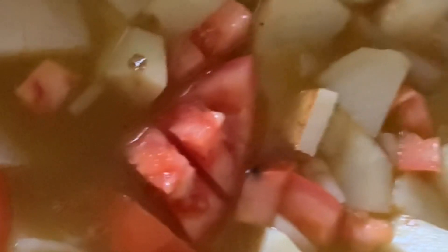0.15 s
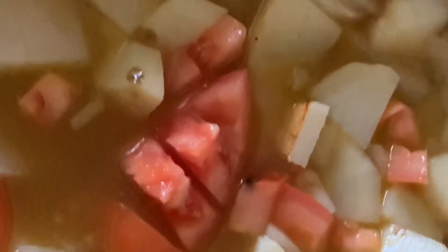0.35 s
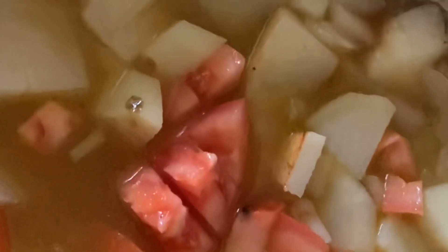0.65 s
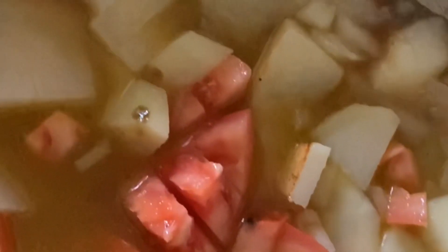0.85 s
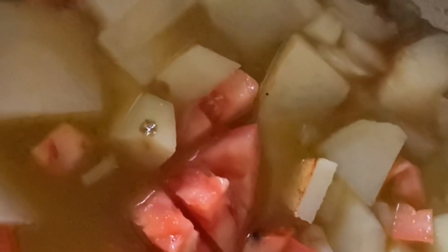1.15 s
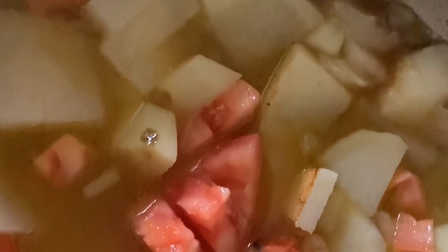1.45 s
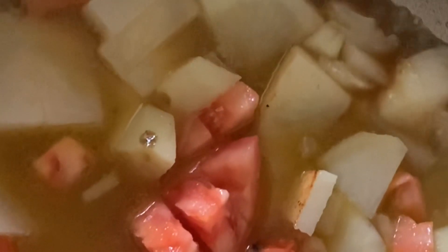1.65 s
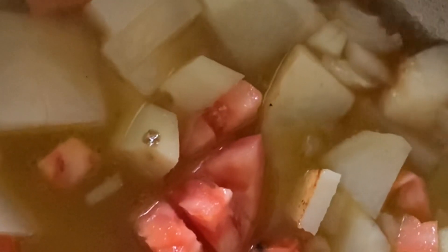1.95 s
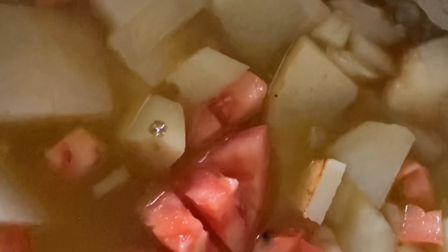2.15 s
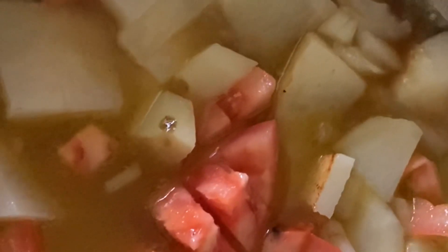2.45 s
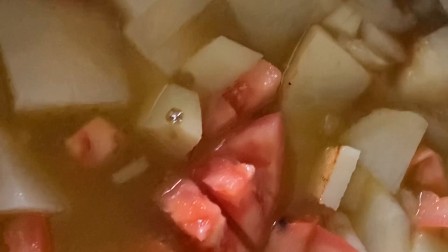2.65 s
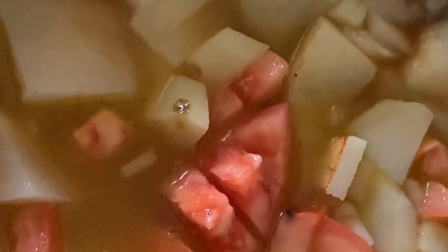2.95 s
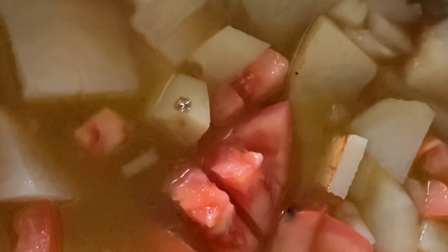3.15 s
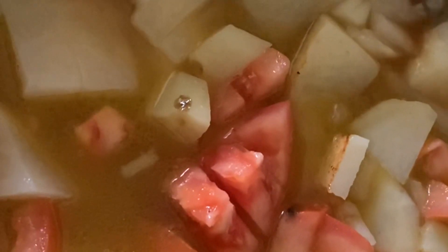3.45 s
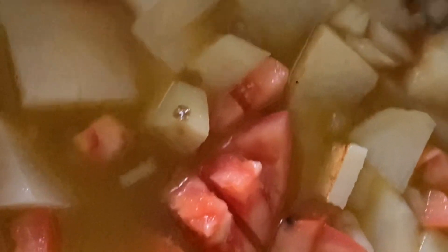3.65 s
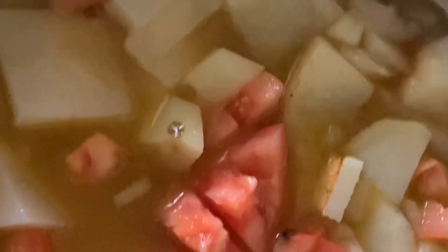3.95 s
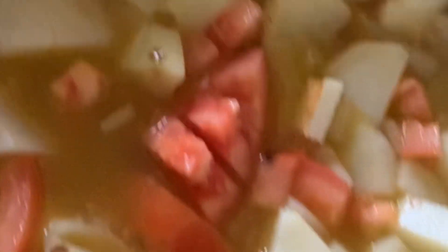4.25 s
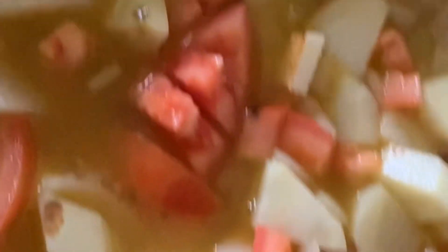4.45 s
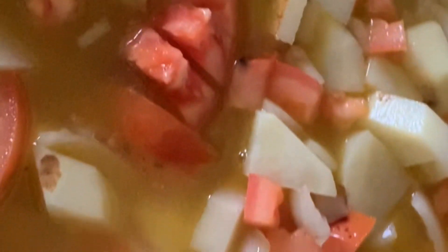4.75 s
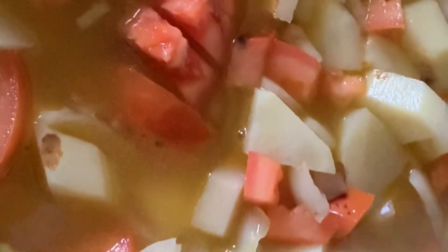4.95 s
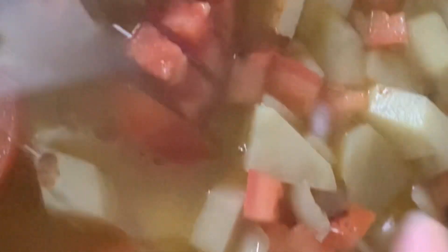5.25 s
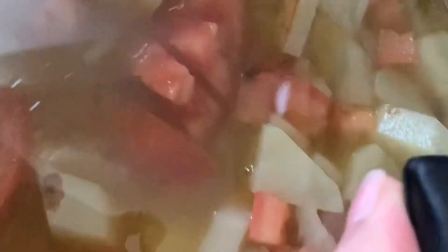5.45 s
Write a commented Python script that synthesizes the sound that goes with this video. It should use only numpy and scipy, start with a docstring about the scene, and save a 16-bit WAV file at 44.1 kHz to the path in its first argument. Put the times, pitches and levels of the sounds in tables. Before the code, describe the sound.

A close stereo pickup in a small kitchen with a short, faint reverberation. Throughout, vegetables simmer in oil and water: a quiet, fine, bright sizzle of dense tiny clicks, with lone sharp spits, over a soft low burner roar. From 0 to 0.1 s a glass lid ticks on the worktop; knocks follow at 0.6 and 0.8 s, the latter with a bright, dry snap. Between 1.2 and 1.9 s it rattles and rubs in small uneven clacks. A hard glassy clack lands at 2.4 s, then a dull, heavy thud at 2.94 s. Soft scraping swells around 3.2 to 3.6 s, with a low bump at 3.65. Mostly sizzle remains until muted thuds near 4.6 and 4.9 s. Around 5.0 s the lid moves over the pot, making the sound duller and hollow. It touches the rim at 5.4 s and clatters loudly at 5.55 s, glass and metal ringing briefly.

```python
"""A fine sizzle with lone spits is heard over a low burner roar: vegetables simmer in oil and water.
Roar is shaped noise, sizzle a crowd of short clicks over hiss, each spit a burst of noise.
A glass lid is knocked, slid and rolled on the worktop: rough forces clack and excite its modes.
Soft thuds, sines mostly falling in pitch, come through the floor. The lid is lowered over the pot,
muffling it, and clatters onto the rim: now the modes of the pot ring too."""
import sys
import numpy as np
from scipy import signal
from scipy.fft import rfft, irfft, next_fast_len
from scipy.io import wavfile

SR = 44100
rng = np.random.default_rng(int(sys.argv[2]) if len(sys.argv) > 2 else 0)


def nominal_scale(level):
    """Amplitude ratio for a level in decibels (scalar or array-like)."""
    x = np.asarray(level, float) / 20
    return 10 ** x


def dump(signal):
    """Clip the signal to [-1, 1] and save it as 16-bit WAV at the path in sys.argv[1]."""
    limited = np.clip(np.atleast_2d(signal).T, -1, 1)
    pcm = np.round(limited * 32767).astype(np.int16)
    wavfile.write(sys.argv[1], SR, pcm)


N = 247160

# sounds of the pot before the lid shades them: (time [s], roar level [dB], sizzle level [dB])
POT_LEVELS = [(0, -36.5, -47), (.2, -40, -42), (.45, -42, -43.5), (1.27, -39.5, -42.5), (1.56, -37, -42.5),
              (1.8, -39, -43), (3.35, -40, -42.5), (3.6, -40, -42.5), (4.3, -41, -40.5), (4.9, -41, -43),
              (5.4, -38.5, -44.5), (5.5, -38, -49.5), (5.6, -26, -28.5)]
# spectrum of the burner roar: (frequency [Hz], level [dB])
ROAR_SPECTRUM = [(25, -38), (38, -15.5), (55, -1.5), (95, 0), (135, 0), (240, -1), (370, -3.5), (800, -3.5),
                 (1350, -9), (1900, -6), (2260, -5.5), (2700, -13.5), (3300, -22), (5000, -12.5),
                 (9000, -23.5)]
# correlation of the roar between left and right: (frequency [Hz], likeness [0-1])
ROAR_LIKENESS = [(60, .995), (250, .97), (500, .75), (1200, .75), (2500, .65), (4000, .8), (6000, .95)]
# spectrum of the sizzle: (frequency [Hz], level [dB])
SIZZLE_SPECTRUM = [(300, -39.5), (1000, -16.5), (2500, -8), (4000, 2.5), (6000, 0.5), (9000, 4.5),
                   (12000, 1.5), (16000, 0)]
# lone spits of oil: (time [s], peak level [dB], centre frequency [Hz])
OIL_SPITS = [(0.084, -20, 10500), (0.0908, -23.5, 6700), (0.0943, -12, 6850), (0.1271, -24, 10600),
             (0.131, -18, 10600), (0.142, -30, 10600), (0.1977, -24.5, 11200), (0.2758, -21, 6560),
             (0.415, -20.5, 10500), (0.4642, -21, 7170), (0.5345, -24, 6440), (0.6883, -22.5, 7340),
             (0.733, -25.5, 6570), (1.024, -17.5, 6530), (1.207, -16.5, 6600), (1.299, -18, 6740),
             (1.825, -22, 11000), (1.831, -15, 7200), (1.8634, -13.5, 11000), (1.917, -26.5, 7500),
             (2.3656, -16.5, 7300), (2.369, -15, 11000), (2.376, -25.5, 7000), (2.407, -18.5, 11000),
             (2.651, -18, 6560), (2.7287, -19, 6040), (3.3148, -19, 5900), (3.495, -21.5, 7050),
             (3.71, -20.5, 6910), (3.7733, -18, 6040), (3.865, -25.5, 7000), (4.0838, -16.5, 11500),
             (4.192, -28, 11000), (4.377, -17, 6640), (4.612, -33.5, 6180), (4.926, -28.5, 10900),
             (4.957, -32, 13500), (5.0483, -27, 14500), (5.053, -23.5, 6800), (5.0993, -25.5, 6540),
             (5.116, -28.5, 14500)]
# how far the lid covers the pot: (time [s], cover [0-1])
LID_COVER = [(0, 0.1), (4.0, 0.05), (4.85, 0.1), (5.08, 0.59), (5.4, 0.6), (5.6, 0.57)]
# resonances of the air under the lid, at full cover: (frequency [Hz], width [Hz], level [dB])
CAVITY_MODES = [(568.8, 17.3, 10.5), (1097, 104.5, 11), (1616, 60, 4.5), (2140, 81, -5)]
# thuds through the floor: (time [s], nominal peak [dB], pitch [Hz], t60 [ms], fall in pitch [0-1])
FLOOR_THUDS = [(0.591, -31.5, 236.8, 68, 0.03), (1.097, -26, 129, 60, 0.85), (1.209, -29, 95.2, 110, 0.2),
               (2.035, -30, 99.8, 170, 0.91), (2.196, -27, 137.7, 73, 0.31), (2.223, -30, 105, 51, 0.15),
               (2.379, -29.5, 98.8, 195, 0.96), (2.713, -26, 180.2, 42.5, 0.6),
               (2.772, -34.5, 149.7, 85, 0.08), (2.9396, -13.5, 172.3, 59.7, 0.49),
               (2.966, -25.5, 130.5, 250, 0), (3.652, -29, 113, 250, 0.72), (4.608, -29, 96.6, 155, 0.95),
               (4.929, -26.5, 105.3, 102, 0.96), (5.029, -34, 106, 510, 0.45),
               (5.464, -37.5, 60.4, 170, 0.4)]
# one bright snap off to one side: (time [s], peak level [dB])
SNAP_EVENT = (0.8047, -11.5)
# modes of the snap: (frequency [Hz], level [dB], t60 of the first resonator [s])
SNAP_RESONANCES = [(4683, 3.5, 0.0052), (3412, 5, 0.0081)]
# touches of the lid on worktop, then rim:
# (time [s], middle-band peak [dB], low over middle band [dB], ring [dB], decay constant [ms])
LID_TOUCHES = [(.0487, -29.5, -1.5, -4.5, 1.84), (.0515, -24.5, 1.5, -5, 5.1), (.0555, -38.5, 6.5, -14, 7),
               (.0774, -45.5, 15, -22.5, 9.9), (.0927, -26.5, -2, -25, 8.1), (.462, -37, -1.5, -25.5, 9.9),
               (.5926, -25.5, -2.5, -13, 18.4), (.8004, -31.5, -4, -30, 1.75),
               (.8041, -20.5, -6, -25, 2.33), (.8085, -28.5, -5.5, -2.5, 17.8), (1.1827, -33.5, 6, -9, 1.7),
               (1.2022, -24, 2, -13.5, 10.5), (1.2135, -27.5, -10, -19, 2.9), (1.2175, -37.5, 6, -9.5, 2.7),
               (1.2251, -29.5, 5, -26, 1.28), (1.255, -34.5, 8.5, -6.5, 4.5), (1.2695, -26, 2.5, -4, 3.5),
               (1.282, -28, -8, -4.5, 16), (1.303, -31.5, -4.5, -1, 8.4), (1.3319, -21, -14, -7, 4.27),
               (1.343, -34.5, -5, -20, 3.2), (1.468, -30, -7, -21.5, 6.5), (1.6018, -27.5, -2.5, -17, 6),
               (1.7875, -32, 4, -14, 2.3), (1.7922, -25, -19.5, -4, 9), (1.812, -40.5, 3, -22.5, 3.2),
               (1.8205, -32.5, -8.5, -21.5, 2.55), (1.831, -22, -3.5, -32, 6.2), (1.839, -27, -1, -25, 2.2),
               (1.9155, -31.5, -2.5, 0.5, 8.2), (2.1904, -34, 3.5, -14, 4), (2.2134, -40.5, 15.5, -9, 3.35),
               (2.3728, -14.5, -9, -7, 4.5), (2.3774, -16.5, -4.5, -2, 2.9),
               (2.3812, -16.5, -0.5, -13, 3.5), (2.3955, -25, 0.5, -13, 5.2),
               (2.4065, -31.5, 0.5, -11, 3.9), (2.419, -30.5, -8, 0, 4.7), (2.4987, -27, -11, -6, 13),
               (2.9372, -28, 12.5, -14, 3.26), (2.945, -31.5, 10, -17, 6.4), (5.4098, -22.5, -3.5, -4, 4.9),
               (5.416, -29.5, 5.5, -32.5, 4.7), (5.4274, -32.5, 6, 0, 14.4),
               (5.5505, -12, -0.5, -7.5, 3.33), (5.5674, -25.5, 3.5, 0.5, 12.2),
               (5.5964, -31, 15, -26.5, 4)]
# slides on worktop, then rim; swell and fade are the times to or from SLIDE_FADE_DB below strongest:
# (strongest time [s], swell [s], fade [s], relative friction [dB], low over middle band [dB])
LID_SLIDES = [(1.525, 0.09, 0.0944, -32.5, 5), (1.625, 0.092, 0.054, -47.5, 7),
              (1.71, 0.0305, 0.031, -37, -2), (1.81, 0.125, 0.186, -36, 4.5),
              (2.055, 0.113, 0.097, -40, 6.5), (2.785, 0.074, 0.045, -34.5, -1.5),
              (3.17, 0.237, 0.56, -39.5, 4.5), (3.334, 0.328, 0.155, -32.5, -11),
              (3.48, 0.257, 0.074, -34, -4.5), (3.62, 0.122, 0.037, -42.5, 2),
              (5.512, 0.0049, 0.0456, -34, 10), (5.526, 0.017, 0.0445, -35, 6.5)]
# modes of lid and worktop: (frequency [Hz], level [dB], t60 [s], weight of spot 1 against spot 0 in exciting it
# [0-1])
LID_MODES = [(130.34, -11.5, 0.324, 0.83), (312.7, -16, 0.216, 0.95), (378.3, -6.5, 0.1173, 0.42),
             (640.6, -5, 0.1125, 0.59), (1034.7, -2, 0.0262, 0.28), (789.7, -11.5, 0.0514, 0.05),
             (1617, -23, 0.136, 0.69), (1799.6, -20.5, 0.125, 0), (2134, -15, 0.0854, 0),
             (2148, -10, 0.0943, 0), (2277.7, -5, 0.165, 1), (2492, -16, 0.185, 1), (2708, -17, 0.15, 0.69),
             (2969, -20, 0.105, 0.08), (2973, -38, 0.39, 0), (4267, -11, 0.046, 1)]
# modes of the pot: (frequency [Hz], level [dB], t60 [s], weight of spot 1 against spot 0 in exciting it [0-1])
POT_MODES = [(319.1, -2.5, 0.203, 0.42), (409.4, -8, 0.099, 0.74), (536, -12.5, 0.053, 0.85),
             (757.5, -14.5, 0.136, 0.14), (3225, -8, 0.11, .3), (3660, -14, 0.096, 0.42),
             (4374, -8, 0.057, 0.48), (5570, -7.5, 0.059, 0.64), (6236, -7.5, 0.089, 0.62),
             (6550, -18.5, .07, 0.6), (7145, -10, 0.085, 0.81), (8280, -29.5, 0.043, 0.44),
             (9890, -8.5, 0.051, 0.34), (11000, -26.5, 0.053, 0.3)]
# low, middle and high band of a contact on the worktop: (from [Hz], to [Hz])
WORKTOP_BANDS = [(200, 998), (1300, 2648), (3600, 5810)]
# low, middle and high band of a contact on the rim: (from [Hz], to [Hz])
RIM_BANDS = [(280, 569), (700, 2430), (3900, 8440)]
# where along its edge the lid bears: (time [s], spot [0-1])
BEARING_SPOT = [(0, 0.77), (1.2, 0.02), (1.55, 0.66), (1.9, 0.36), (2.2, 0.49), (2.38, 0.14), (2.5, 0.38),
                (3.14, 0.11), (3.24, 0.4), (3.33, 0.82), (3.42, 0.45), (3.48, 1), (3.62, 0.98), (5.41, 0.1),
                (5.55, 0.91)]
# microphone pair: (frequency [Hz], right lags left, negative leads [rad], left over right [dB])
MICROPHONE_PAIR = [(0, 0, 0), (120, 0, .7), (300, -.15, 2), (600, -.9, 2), (950, -.5, -2.5),
                   (1500, .1, -1.5), (2200, .35, 0), (3200, 1.1, -.5), (4720, 3.14, 0), (6930, 6.28, 0),
                   (15200, 18.85, 0), (22050, 29.2, 0)]

KITCHEN_T60_S, WALL_CUT_HZ, KITCHEN_DB = 0.131, 13000, -11
THUD_RISE_S, THUD_HOLD_S = 0.006, 0.016  # the push builds, then holds before it dies
SNAP_LAG = 2  # samples the right side hears the snap later, relative to the pot
ON_RIM_S = 5.0  # contacts after this time are on the rim
TOUCH_RISE_S, CHATTER_DB = 0.000458, 6.5  # rise of a contact; its unevenness from snap to snap
WORKTOP_HIGH_DB, RIM_HIGH_DB = -6, 4.5  # high over middle band of a contact
RIM_SOFT_DB, HARD_DB_PER_10DB = -18.5, -19  # rim touches above this level lose treble at this rate
SLIDE_FADE_DB = 25
TOP_HZ, TOP_DB = 15780, -38  # treble cut: above this frequency, by this gain


def rms_one(x):
    """Normalisation: equal mean power, so rms 1."""
    return x / np.sqrt(np.mean(x ** 2) + 1e-20)


def in_time(rows):
    """Linear interpolation: the columns of a curve, sample by sample."""
    s, *columns = np.transpose(rows)
    return [np.interp(np.arange(N) / SR, s, column) for column in columns]


def at_hz(points, hz):
    """Logarithmic frequency scale: a spectrum is read by interpolation along it."""
    point_hz, value = np.array(points).T[:2]
    return np.interp(np.log(hz), np.log(point_hz), value)


def band(x, low_hz, high_hz):
    """Band-pass filtering by a Butterworth filter."""
    edges = [low_hz, min(high_hz, .45 * SR)]
    return signal.sosfilt(signal.butter(2, edges, "band", fs=SR, output="sos"), x)


def drift(rate_hz):
    """Low-pass filtered noise: a slow random curve of spread 1."""
    step = 40  # samples between computed points
    r = np.exp(-2 * np.pi * step * rate_hz / SR)
    noise = rng.standard_normal(N // step + 2002)
    slow = signal.lfilter([1], [1, -2 * r, r * r], noise)[2000:]
    return np.interp(np.arange(N) / step, np.arange(len(slow)), rms_one(slow))


def ring(force, hz, t60):
    """Damped resonance: a unit click sets a decaying sine of height 1 ringing."""
    r, w = nominal_scale(-60 / (t60 * SR)), 2 * np.pi * hz / SR
    return signal.lfilter([0, np.sin(w)], [1, -2 * r * np.cos(w), r * r], force + 1e-18)


def add(track, s, piece):
    """Superposition: a piece is mixed in at s seconds."""
    i = round(s * SR)
    track[..., i:i + piece.shape[-1]] += piece[..., :N - i]


def coloured(x, spectrum):
    """Spectral shaping: a flat sound takes on a spectrum, at rms 1."""
    hz = np.maximum(np.fft.rfftfreq(N, 1 / SR), 1)
    return rms_one(irfft(rfft(x) * nominal_scale(at_hz(spectrum, hz)), N))


def roar(patchy_db):
    """Turbulence noise of flame and kitchen air: partly correlated sides, each region flickering."""
    hz = np.maximum(np.fft.rfftfreq(N, 1 / SR), 1)
    alike = np.clip(at_hz(ROAR_LIKENESS, hz), 0, 1)
    mid, side = rfft(rng.standard_normal((2, N))) * nominal_scale(at_hz(ROAR_SPECTRUM, hz))
    both = np.sqrt(1 + alike) * mid + np.sqrt(1 - alike) * side * [[1], [-1]]
    edges = [0, 200, 600, 1500, SR]
    shared = drift(12.0)
    out = np.zeros((2, N))
    for low, high in zip(edges, edges[1:]):
        region = irfft(both * (hz >= low) * (hz < high), N)
        out += region * nominal_scale(patchy_db * (1.147 * shared + drift(1.177)))
    return rms_one(out)


def sizzle(per_s, spread_db, clump_db, hiss_db):
    """Bubble collapse: vapour bubbles burst in random clumps, clicks of a few cycles over a hiss."""
    rate = per_s * nominal_scale(clump_db * (drift(6.0) + drift(35.0)))
    born = rng.random(N) < rate / SR
    sizes = nominal_scale(spread_db * np.minimum(rng.exponential(1, N), 6)) * rng.choice([-1, 1], N) * born
    pitches = np.geomspace(900, 15000, 12)
    dealt = rng.integers(0, 13, N)  # one of 12 pitches, or an unpitched crack
    bursts = np.zeros(N)
    for k, hz in enumerate(pitches):
        bursts += rms_one(ring(sizes * (dealt == k), hz, 4.55 / hz)) * np.sqrt(hz)
    cracks = nominal_scale(-11.0) * rms_one(sizes * (dealt == 12))
    hiss = nominal_scale(hiss_db) * rng.standard_normal(N)
    return coloured(rms_one(bursts) + cracks + hiss, SIZZLE_SPECTRUM)


def spits():
    """Transient noise: each spit is a millisecond of crackle, loudest round its centre."""
    out, t = np.zeros(N), np.arange(400) / SR
    for (s, peak_db, hz), noise in zip(OIL_SPITS, rng.standard_normal((len(OIL_SPITS), 400))):
        crack = noise * np.exp(-t / 0.0005)
        pop = band(crack, 0.75 * hz, 1.3 * hz) + nominal_scale(-2.0) * band(crack, 1000, 16600)
        add(out, s, nominal_scale(peak_db) * pop / np.abs(pop).max())
    return out


def under_lid(x, cover):
    """Shading and cavity resonance: the lid dulls the open sound and the air under it resonates."""
    out = x - 1.18 * cover * band(x, 376, 3760)
    out = out - 0.15 * cover * band(out, 768, 772)  # a slight narrow dip
    for hz, width_hz, level_db in CAVITY_MODES:
        r = np.exp(-np.pi * width_hz / SR)
        feedback = [1, -2 * r * np.cos(2 * np.pi * hz / SR), r * r]
        air = signal.lfilter([(1 - r * r) / 2, 0, (r * r - 1) / 2], feedback, x)
        out = out + cover * nominal_scale(level_db) * air
    return out


def thuds():
    """Damped oscillation: a soft push gives a few cycles, most falling in pitch, and a rumbling tail."""
    out, t = np.zeros(N), np.arange(16000) / SR
    noises = rng.standard_normal((len(FLOOR_THUDS), 16000))
    for (s, peak_db, hz, t60_ms, fall), noise in zip(FLOOR_THUDS, noises):
        pitch = hz * (1 - fall + 1.298 * fall * np.exp(-t / 0.03076))
        decay_db = -60000 * np.maximum(t - THUD_HOLD_S, 0) / t60_ms
        push = np.sin(2 * np.pi * np.cumsum(pitch) / SR) * nominal_scale(decay_db)
        rumble = rms_one(band(noise, hz * (1 - fall) * 0.77, 1.365 * hz))
        rumble = rumble * nominal_scale(-16.5 + decay_db / 2.95)  # dies more slowly than the push
        add(out, s, nominal_scale(peak_db) * (push + rumble) * (1 - np.exp(-t / THUD_RISE_S)))
    return out


def kitchen(x):
    """Reverberation by repeated reflection: six feedback delays a side, each duller at every pass."""
    size = next_fast_len(N + SR)
    w = 2 * np.pi * np.fft.rfftfreq(size)
    dull = 1 / (1 + 1j * w * SR / (2 * np.pi * WALL_CUT_HZ))
    response = np.zeros((2, len(w)), complex)
    for k, lag in enumerate(rng.uniform(.008, .03, 12) * SR):
        loop = nominal_scale(-60 * lag / SR / KITCHEN_T60_S) * dull * np.exp(-1j * w * lag)
        response[k % 2] += loop / (1 - loop) * (-1) ** (k // 2)
    return irfft(response * rfft(x, size), size)[:, :N]


def snap():
    """Impulse excitation of cascaded resonators: two high modes ring for a few milliseconds."""
    s, peak_db = SNAP_EVENT
    force = np.zeros(N)
    force[round(s * SR)] = 1
    tone = np.zeros(N)
    for hz, level_db, t60 in SNAP_RESONANCES:
        tone += nominal_scale(level_db) * hz * ring(ring(force, hz, t60), hz, 0.0033)
    return nominal_scale(peak_db) * np.array([tone, np.roll(tone, SNAP_LAG)]) / np.abs(tone).max()


def contacts(touches, slides, modes, bands, high_db, hard_db):
    """Modal excitation: rough forces of touch and friction clack and set the modes ringing."""
    clack, force, t = np.zeros(N), np.zeros((3, N)), np.arange(4000) / SR
    for row, (noise, grain) in zip(touches, rng.standard_normal((len(touches), 2, 4000))):
        s, peak_db, low_db, ring_db, contact_ms = row
        burst = noise * np.exp(-1000 * t / max(contact_ms, .5)) * np.minimum(t / TOUCH_RISE_S, 1)
        burst *= nominal_scale(CHATTER_DB * np.repeat(grain[::40], 40))  # breaks up into snaps of about 1 ms
        treble_db = high_db + hard_db * max(peak_db - RIM_SOFT_DB, 0) / 10
        shares = nominal_scale(peak_db + np.array([low_db, 0, treble_db]))
        for share, edges in zip(shares, bands):
            part = band(band(burst, *edges), *edges)
            add(clack, s, share * part / np.abs(part).max())
        push = nominal_scale(ring_db) * shares[:, None] * 0.728 * burst / np.sqrt(np.sum(burst ** 2))
        push[:, 8] += 1.195 * nominal_scale(ring_db) * shares  # one sharp blow amid the chatter
        add(force, s, push)

    grit = nominal_scale(1.65 * np.minimum(rng.exponential(1, N), 4)) * rng.standard_normal(N)
    grit = rms_one(grit * nominal_scale(0.7 * drift(21.0)))
    rub, now = np.zeros((3, N)), np.arange(N) / SR
    for s, rise_s, fall_s, level_db, low_db in slides:
        fade = np.maximum((s - now) / rise_s, (now - s) / fall_s)
        friction = grit * nominal_scale(level_db - SLIDE_FADE_DB * fade)
        rub += friction * nominal_scale(np.array([[low_db], [0], [high_db]]))
    force += nominal_scale(-30.0) * rub
    clack += nominal_scale(3.0) * sum(band(part, *edges) for part, edges in zip(rub, bands))

    spot = np.clip(in_time(BEARING_SPOT)[0], 0, 1)
    for hz, level_db, t60, lobe in modes:
        share = force[int(hz > bands[0][1]) + int(hz > bands[2][0])]
        coupling = 2 * ((1 - lobe) * (1 - spot) + lobe * spot)  # depends on where the lid bears
        clack += nominal_scale(level_db) * ring(coupling * share, hz, t60)
    return clack


def lid():
    """Coupled resonators: lid and worktop modes ring first; on the rim the pot rings with the lid."""
    def part(rows, rim):
        return [row for row in rows if (row[0] > ON_RIM_S) == rim]
    on_worktop = contacts(part(LID_TOUCHES, False), part(LID_SLIDES, False), LID_MODES,
                          WORKTOP_BANDS, WORKTOP_HIGH_DB, 0)
    # the four lowest modes are silent on the rim
    on_rim = contacts(part(LID_TOUCHES, True), part(LID_SLIDES, True), LID_MODES[4:] + POT_MODES,
                      RIM_BANDS, RIM_HIGH_DB, HARD_DB_PER_10DB)
    return on_worktop + on_rim


def scene():
    """Superposition of sources: the pot, the floor and the lid, with the lid's reverberation."""
    roar_db, sizzle_db = in_time(POT_LEVELS)
    cover, = in_time(LID_COVER)
    flame = under_lid(nominal_scale(roar_db) * roar(patchy_db=1.6173), cover)
    oil = nominal_scale(sizzle_db) * sizzle(per_s=4000, spread_db=3.0, clump_db=4.0, hiss_db=-5.5)
    oil = oil - 0.796 * cover * band(oil, 2780, 18200)  # the glass screens off the finest hiss
    glass = lid()
    echoes = nominal_scale(KITCHEN_DB) * kitchen(band(glass, 405, 7200))
    return flame + oil + spits() + snap() + glass + thuds() + echoes


def roll_off(x):
    """The treble ends steeply here."""
    return signal.sosfilt(signal.butter(12, 16970, fs=SR, output="sos"), x)


def record(dry):
    """Stereo phase and level differences: the right side trails the left by a phase that grows with frequency
    and rises in smooth steps in the treble, with the top cut."""
    hz, trail, tilt_db = np.transpose(MICROPHONE_PAIR)
    axis = np.fft.rfftfreq(N, 1 / SR)
    turn = np.interp(axis, hz, trail)
    turn -= 0.3 * np.sin(2 * turn) * (axis > 3500)  # above 3.5 kHz the phase difference rises in smooth steps, dwelling where the sides are in step or opposed
    half = nominal_scale(np.interp(axis, hz, tilt_db) / 2) * np.exp(.5j * turn)
    top_cut = nominal_scale(TOP_DB * (axis > TOP_HZ))
    mix = irfft(rfft(dry) * [half, 1 / half] * top_cut, N)
    return roll_off(mix)


dry = scene()
out = record(dry)
dump(out)
```